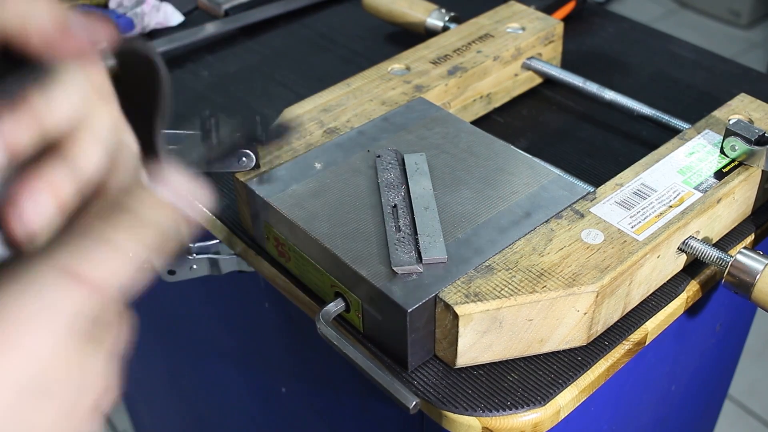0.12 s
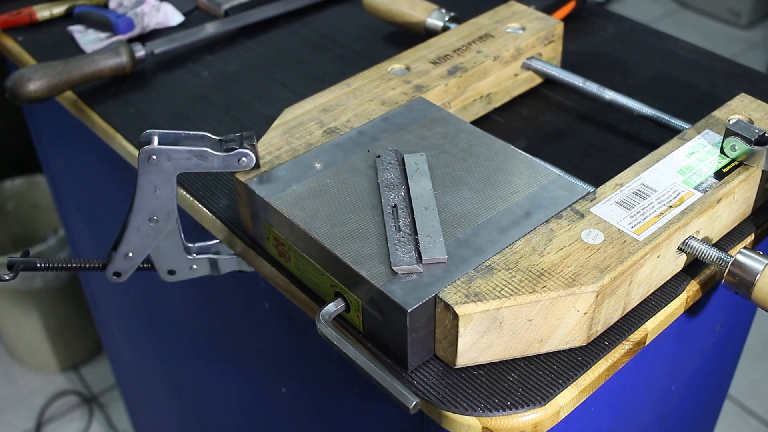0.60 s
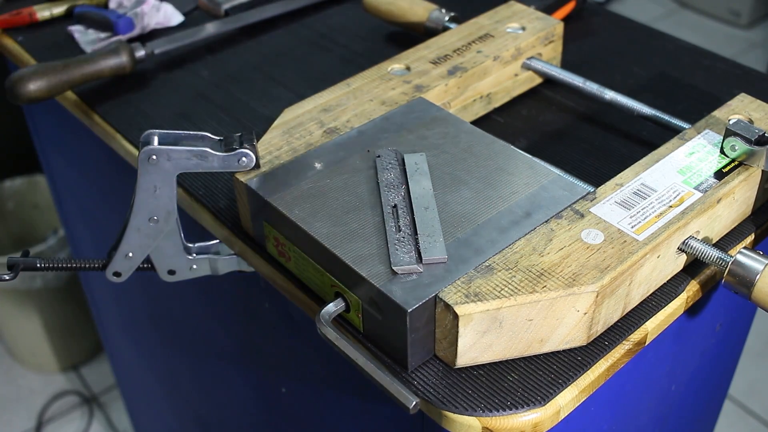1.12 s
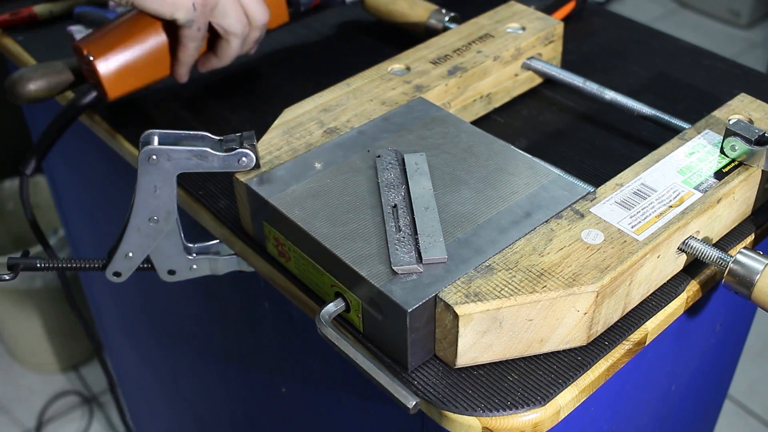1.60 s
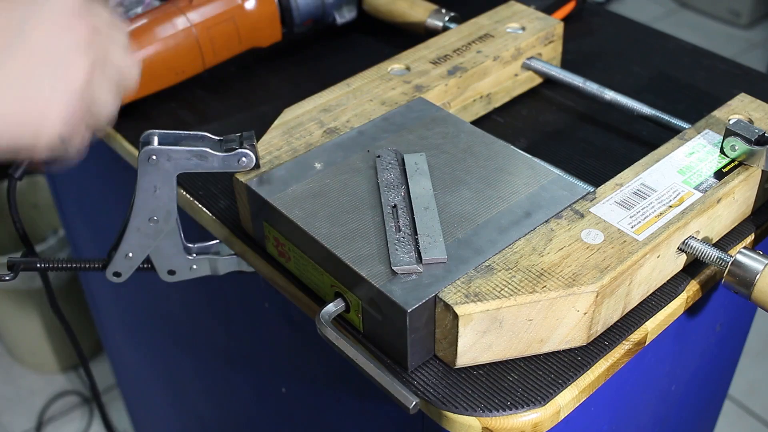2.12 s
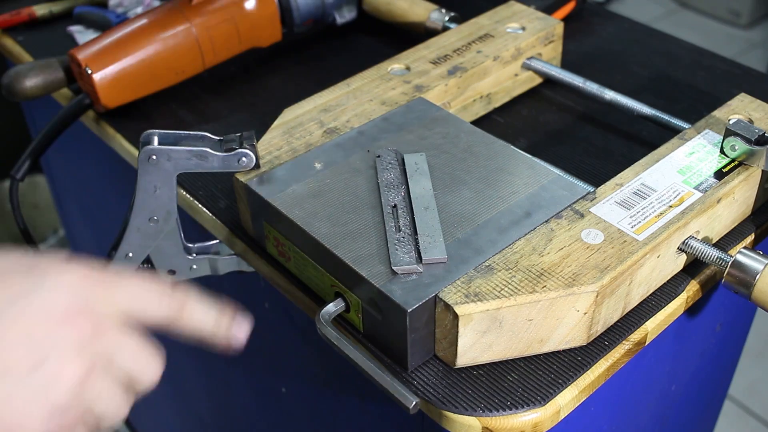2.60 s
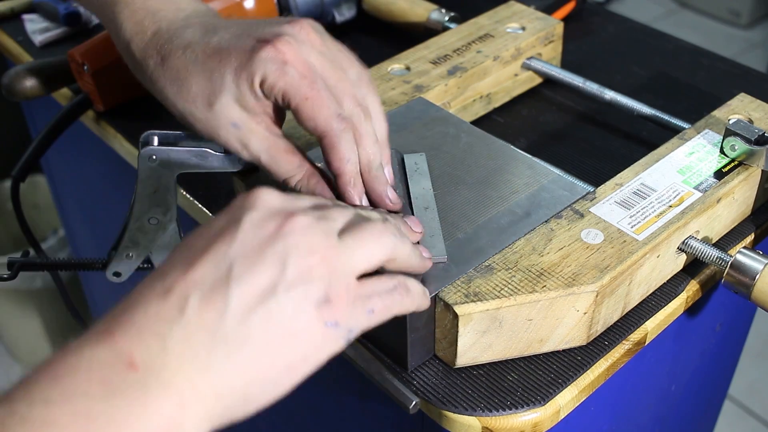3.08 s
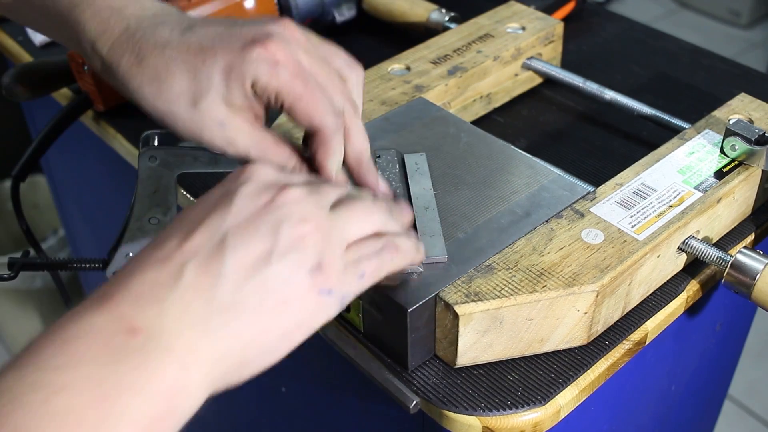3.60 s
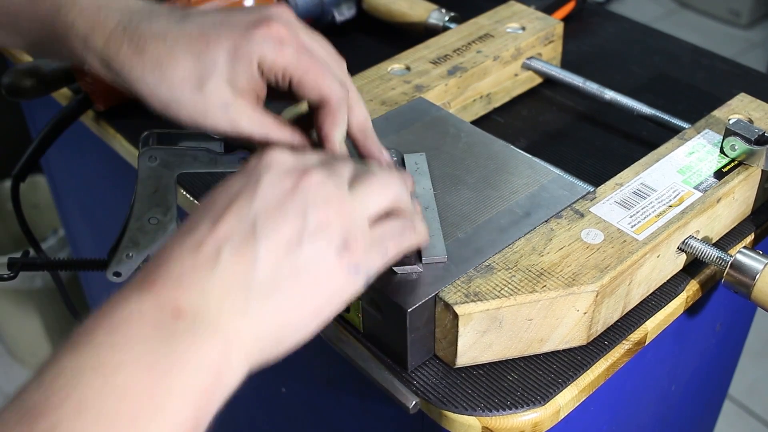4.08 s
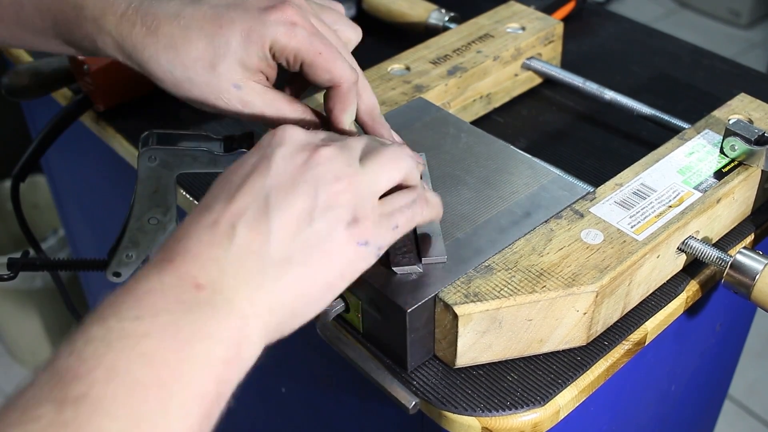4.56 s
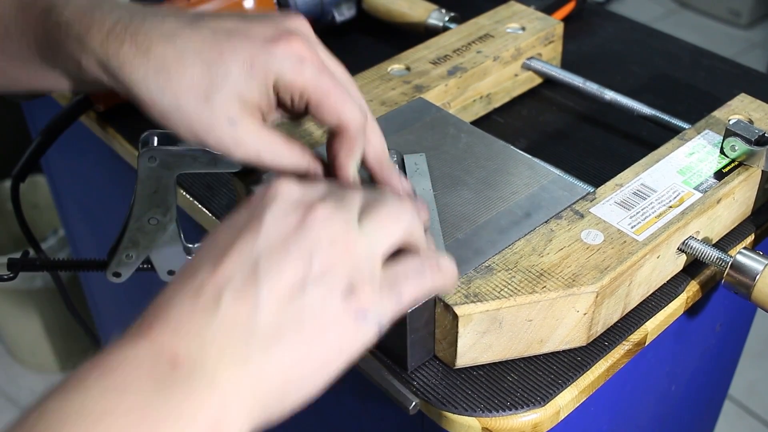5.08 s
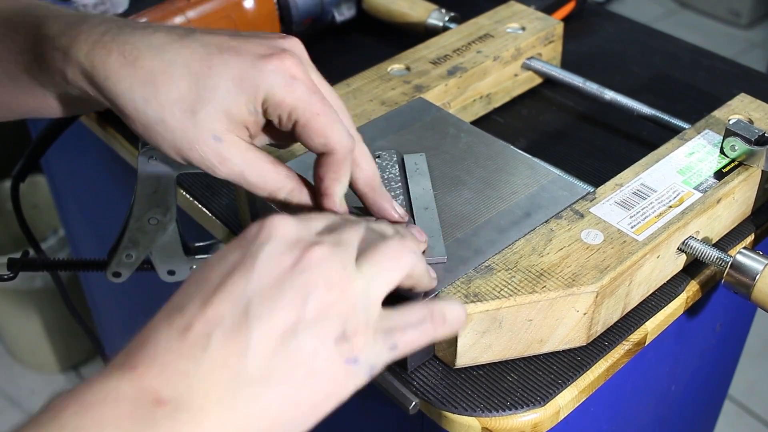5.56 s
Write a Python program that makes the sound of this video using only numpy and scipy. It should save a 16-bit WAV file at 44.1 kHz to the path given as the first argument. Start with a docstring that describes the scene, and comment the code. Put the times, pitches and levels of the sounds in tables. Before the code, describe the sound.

Close, dry mono pickup in a small workshop. From 0 s a hand-held electric tool runs: a buzzy whine with many rotor tones, bright gear rattle, airy fan hiss and a faint duct hum. At about 0.58 s a sharp knock marks the switch, followed around 0.65-0.8 s by low, thumping air gusts on the microphone. The pitch slides steadily down as the motor coasts; hiss and hum fade first, leaving a thinner, rattling whir. A softer knock with a low thud lands at 2.0 s over faint bench rumble, and the whir dwindles. At 2.77 s the sound cuts abruptly to quiet room noise, with faint scuffs and a small tick at 2.97 s. From 3.2 s a stone scrapes a steel bar back and forth, one gritty stroke roughly every 0.2 s, bright and ringing with a dull plate undertone, growing stronger until about 5.5 s, with the last stroke softer.

```python
"""Power tool, then stone on steel

A hand-held power tool runs, is switched off and coasts down while it is laid on a bench: rotor tones,
gear rattle, fan hiss and duct hum, with knocks, a bench rumble and air buffeting the microphone.
After a scene change, fingers slide a small abrasive stone to and fro on a steel bar lying on a heavy
plate: dense random grit rings the modes of the bar; a short noise tail is the small workshop's answer."""
import sys
import numpy as np
from scipy import signal
from scipy.fft import rfft, irfft, next_fast_len
from scipy.io import wavfile
from scipy.ndimage import uniform_filter1d, map_coordinates

SR = 44100
rng = np.random.default_rng(int(sys.argv[2]) if len(sys.argv) > 2 else 0)


def log_audio(samples):
    """Write samples as a 16-bit WAV file to the path given in sys.argv[1]."""
    # one column per channel
    frames = np.atleast_2d(samples).T
    # limit to full scale, then quantise
    limited = np.clip(frames, -1, 1)
    pcm = np.round(limited * 32767).astype(np.int16)
    wavfile.write(sys.argv[1], SR, pcm)


def elevation(decibels):
    """Turn decibel levels (scalar or array-like) into linear amplitude ratios."""
    levels = np.asarray(decibels, float)
    return 10 ** (levels / 20)


N = 250473
TIME = np.arange(N) / SR
CUT_S = 2.767

# Stone strokes, forth and back in turn. Each row: start in seconds, time to full speed in seconds,
# slowness of the start (exponent), level in dB, lowest mode family in dB before the shift by place.
STROKES = [(3.197, .17, 1.64, -22, -1.5), (3.493, 0.073, 0.69, -19.5, -2), (3.701, 0.072, 0.51, -20, -2),
           (3.902, 0.091, 0.95, -17.5, -4), (4.117, 0.099, 0.35, -19, -3.5), (4.314, .11, 0.74, -16, -7),
           (4.527, 0.085, 0.66, -17, -7), (4.722, 0.1, 0.59, -17, -10.5), (4.922, 0.08, 0.97, -15.5, -6.5),
           (5.12, 0.096, 0.6, -15.5, -8.5), (5.319, 0.083, 0.93, -15.5, -7), (5.516, .095, 0.42, -19, -4)]
# Fingers nudge the stone into place. Each row: start in seconds, width of the slowing bell in seconds,
# level in dB, second mode family in dB re the upper modes.
NUDGES = [(2.765, 0.062, -42, 14.5), (2.846, 0.026, -33.5, 10.5)]
NUDGE_RISE_S, NUDGE_SLOWNESS, NUDGE_LOW_DB = 0.005, 0.27, 16.5
NUDGE_PLATE_DB = -5  # light nudges barely reach the plate
LAST_TURN_S = 5.72
SLOWING_SHARE = 0.29  # width of the slowing bell, as a share of the time left until the hand turns
# Stone is set down. Each row: start in seconds, driving burst in dB.
TAPS = [(2.9704, -10), (2.984, -25), (3.0084, -32)]
# Steel bar, bending modes split by the plate under it, low to high families.
# Each row: frequency in Hz, width of the first resonator in Hz, relative gain in dB.
BAR_LOW_MODES = [(2580, 376, -7.5), (2907, 210, -2.5), (3240, 170, -2.5), (3385, 45, -1.5), (3536, 390, -3)]
BAR_MID_MODES = [(4886, 1000, -7), (5800, 310, -0.5), (5930, 160, 6), (6517, 620, 3.5), (6984, 42, 10.5),
                 (7130, 450, -17)]
BAR_TOP_MODES = [(7280, 265, -7.5), (8237, 810, -3), (8894, 102, -8.5), (9170, 120, 1), (9050, 1800, -15)]
BAR_SHEEN_MODES = [(10730, 2800, -6.5), (12290, 610, -13), (13840, 390, -3), (12340, 3700, -9.5),
                   (15060, 460, -12.5)]
# Families re the upper modes, set by where the stone bears: near end in dB, far end in dB.
LOW_BY_PLACE_DB, MID_BY_PLACE_DB, SHEEN_DB = (-2, 1.62), (-5, 0.61), -2.5
MODE_WANDER_DB, SLIDE_SHARE = 3.2, 0.018
# Heavy plate spectrum. Each row: frequency in Hz, relative level in dB per Hz.
PLATE_SPECTRUM = [(24, -82), (40, -27), (281, -14), (415, -18), (739, -12.5), (832, -15.5), (1970, -5.5),
                  (2300, -4), (2990, -19.5), (5060, -120)]
PLATE_FOLLOWS_LOW = 0.34  # dB on the plate per dB of the lowest mode family
PLATE_WANDER_DB = 3.5

# Rotor: steady under current, then slowed by bearing friction and by fan drag (grows with speed squared).
FULL_TURNS_PER_S, SWITCH_OFF_S = 239.3, 0.59
FRICTION_TURNS_PER_S2, FAN_DRAG_PER_TURN = 79, 6e-4
# Tones locked to the rotor (fan blades, commutator bars, gear teeth), as multiples of the turn rate.
MULTIPLES = [6, 9, 12, 15, 18, 24, 25, 29, 30, 36, 42, 48, 54, 60]
# Strength of each multiple in dB, with the current on and coasting.
POWERED_DB = [-7, -20, -4, -11, -8, -12, -12, -4, -4, -26, -28, -28, -30, -30]
COASTING_DB = [-9, -14, -9, -19, -9, -6, -22, -18, -10, -11, -16, -12, -18, -17]
TONE_FLICKER_DB = 4.5
# Gears and brushes as heard while the tool is swung round and laid down.
# Each row: time in seconds, rattle level in dB.
GEARS_LEVEL = [(0.24, -41.5), (0.61, -36.5), (0.86, -39.5), (1.32, -48), (1.58, -48.5), (2.11, -48),
               (2.62, -56.5), (2.75, -58.5)]
# Housing response to rattle at middle speed, to rattle at low speed, and to rotor tones.
# Each row: frequency in Hz, gain in dB.
HOUSING = [(1180, -83), (2000, -40), (2220, -7), (2560, -41), (3260, 3), (4070, 2), (5840, 2.5),
           (6750, 10.5), (10000, -14.5), (15500, -5)]
HOUSING_SLOW = [(880, -57), (1500, -44), (2170, -25), (2970, -2), (3580, 7), (4100, -5), (4600, -14),
                (5090, -6), (5670, -10), (12100, -29), (15500, -18)]
HOUSING_TONES = [(700, -32), (1350, -13), (1750, -23), (2200, -17), (2600, -19), (3300, -3), (4300, -9),
                 (5300, 0), (6200, -8), (7050, 0), (7900, -22), (12000, -34)]
# Cooling air spectrum. Each row: frequency in Hz, relative level in dB per Hz.
AIR_SPECTRUM = [(120, -47), (200, -12.5), (607, -2), (1030, -3), (1430, 3), (2290, -6.5), (2800, 1),
                (4030, -5), (6960, 0.5), (11000, -14), (15500, -19)]
# Cooling air and duct hum: level at full speed, amplitude as a power of speed.
AIR_DB, AIR_POWER = -37.4, 1.01
HUM_DB, HUM_POWER = -47.5, 6.1
AWAY_DB, AWAY_S = -17.5, 1.41  # the outlet turns away from the microphone
DUCT_HZ, DUCT_WIDTH_HZ = 627, 200
# Tool knocks, switch and bench. Each row: start in seconds, peak of the ring in dB, thud in dB,
# tail of the crack in seconds.
KNOCKS = [(0.575, -24, -80, 0.015), (1.991, -29.5, -42.5, 0.14)]
# Knock modes, the bench thud first, then the housing.
# Each row: frequency in Hz, relative gain in dB, 60 dB decay in seconds.
KNOCK_MODES = [(167, 0, 0.12), (1390, -6, 0.034), (1970, -9, 0.05), (5450, 3, 0.025), (5750, 4, 0.04),
               (7550, -4, .04), (8600, -1.5, 0.026)]
# Gusts over the microphone. Each row: start of the hold in seconds, hold in seconds, gain in dB.
GUSTS = [(.03, 0.079, -54), (.13, 0.02, -50), (.28, 0.11, -56), (0.656, 0.039, -26.5), (.725, 0.057, -33),
         (.85, 0.12, -59), (1.1, 0.17, -81)]
GUST_RISE_DB_PER_S, GUST_FALL_DB_PER_S = 1500, 450
# The tool's weight settles on the bench.
TOUCH_S, SETTLE_S, SETTLE_DB, SETTLED_DB = 1.72, 2.04, -63, -88
SETTLE_RISE_DB_PER_S, SETTLE_FALL_DB_PER_S = 45, 105
# Quiet shop spectrum. Each row: frequency in Hz, relative level in dB per Hz.
SHOP_SPECTRUM = [(18, -48), (30, -3.5), (292, -3), (606, -8), (1720, -17), (4090, -18.5), (8950, -1.5),
                 (12600, -17), (15500, -18)]
SHOP_DB = -60


def level(x, db=0):
    """Scales to an rms level."""
    return x * elevation(db) / np.sqrt(np.mean(x ** 2))


def curve(rows):
    """Columns of a (s, value, ..) table at every sample."""
    s, *columns = np.transpose(rows)
    return [np.interp(TIME, s, c) for c in columns]


def colour(x, points):
    """Filters through a (Hz, dB) spectrum."""
    size = next_fast_len(N + SR // 4)
    hz, db = np.transpose(points)
    bins_hz = np.arange(size // 2 + 1) * SR / size
    gain = elevation(np.interp(np.log(bins_hz + 1), np.log(hz), db))
    return irfft(rfft(x, size) * gain, size)[:N]


def resonance(x, hz, width_hz):
    """Two-pole resonance, gain 1 at the centre."""
    return signal.lfilter(*signal.iirpeak(hz, hz / width_hz, SR), x)


def walk(rate):
    """Random levels held 1 / rate s and slewed twice; spread near 1."""
    k = int(SR / rate)
    held = np.repeat(rng.standard_normal(N // k + 1), k)
    return 1.59 * uniform_filter1d(uniform_filter1d(held, k), k)[:N]


def grit(rate, spread_db):
    """Random catches at a mean rate per second, mostly small, a few large; unit rms."""
    hit, size, sign = rng.random((3, N))
    sizes = elevation(-spread_db * np.log(size + 2e-4))
    return level((hit < rate / SR) * sizes * np.sign(sign - 0.5))


def blow(s, db, tail_s):
    """A burst of noise that dies away by 60 dB in tail_s."""
    age = TIME - s
    decay = np.exp(-np.log(1000) * np.maximum(age, 0) / tail_s)
    return elevation(db) * (age >= 0) * rng.standard_normal(N) * decay


def swell(s, held_s, db, rise_db_per_s, fall_db_per_s):
    """Gain that climbs to a level, holds and sinks, straight in dB."""
    before_s = np.clip(s - TIME, 0, 1)
    after_s = np.clip(TIME - s - held_s, 0, 1)
    return elevation(db - rise_db_per_s * before_s - fall_db_per_s * after_s)


def stone():
    """Dense grit with stick-slip surges drives the bar and the plate; taps ring three of the bar's families."""
    push, pace = hand()
    places = []
    for s, rise, _, fall, _, early, late in moves():
        places += [(s + rise / 2, *early), (s + rise + fall, *late)]
    low_db, mid_db = curve(places)
    surges = elevation(1.4 * walk(350))
    # grains near and far from a node drive each family in their own way
    families = []
    for modes in (BAR_LOW_MODES, BAR_MID_MODES, BAR_TOP_MODES, BAR_SHEEN_MODES):
        ringing = bar(surges * grit(10000, 1.7), modes, MODE_WANDER_DB)
        families.append(level(detuned(ringing, SLIDE_SHARE, 12)))
    # a slow stone strikes too softly to wake the highest modes
    shares = elevation(low_db), elevation(mid_db), 1, elevation(SHEEN_DB) * (pace + 0.03) ** 0.27
    mixed = sum(g * v for g, v in zip(shares, families))
    rub = push * mixed / np.sqrt(sum(g ** 2 for g in shares))
    # the heavy plate follows the push more weakly
    scouring = surges * grit(10000, 1.8) + 0.7 * grit(900, 2.2)
    plate = level(colour(scouring, PLATE_SPECTRUM) * elevation(PLATE_WANDER_DB * walk(8)), -40)
    stroke_plate_db = 2.5 + PLATE_FOLLOWS_LOW * low_db
    plate_db = np.where(TIME < STROKES[0][0], NUDGE_PLATE_DB, stroke_plate_db)
    plate = plate * push ** 0.39 * elevation(plate_db)
    taps = sum(blow(s, db, 0.0043) for s, db in TAPS)
    tapped = elevation(12) * bar(taps, BAR_LOW_MODES, 0) + elevation(-4.5) * bar(taps, BAR_MID_MODES, 0)
    tapped = tapped + elevation(-7) * bar(taps, BAR_TOP_MODES, 0) + elevation(-3) * resonance(taps, 1180, 140)
    return rub + plate + tapped


def bar(force, modes, wander_db):
    """Rings one family of modes; the place of contact wanders and shares the drive out anew among them."""
    shares = np.array([elevation(wander_db * walk(16)) for _ in modes])
    shares = shares / np.sqrt(np.mean(shares ** 2, axis=0))
    out = 0
    for k, (hz, width_hz, db) in enumerate(modes):
        ringing = resonance(resonance(force, hz, width_hz), hz, 2 * width_hz)
        out = out + (-1) ** k * elevation(db) * shares[k] * ringing
    return out


def detuned(x, share, rate):
    """The moving stone and fingers load the bar, so its modes slide a little in pitch."""
    return map_coordinates(x, [np.arange(N) + np.cumsum(share * walk(rate))], mode="mirror")


def hand():
    """Each stroke breaks loose, speeds up along an arc, slows along a bell; gives push and share of full speed."""
    push, pace = np.zeros((2, N))
    for s, rise, slowness, fall, db, _, _ in moves():
        age = TIME - s
        arc = np.sin(np.pi / 2 * np.clip(age / rise, 0, 1)) ** slowness
        rising = arc * np.clip(age / (0.091 * rise), 0, 1)
        # the stone sticks at the turn and lets go with a jerk
        jerk = 0.06 * np.clip(age / 0.0095, 0, 1) * np.exp(-np.maximum(age, 0) / 0.048)
        slowing = np.exp(-0.5 * (np.maximum(age - rise, 0) / fall) ** 2)
        shape = (rising + jerk) * slowing
        pace, push = np.maximum(pace, shape), np.maximum(push, elevation(db) * shape)
    return push, pace


def moves():
    """All hand moves: start s, rise s, slowness, fall s, dB, (lowest, second family dB) early and late."""
    rows = []
    for s, fall, db, mid_db in NUDGES:
        place = (NUDGE_LOW_DB, mid_db)
        rows.append((s, NUDGE_RISE_S, NUDGE_SLOWNESS, fall, db, place, place))
    turns_s = [row[0] for row in STROKES[1:]] + [LAST_TURN_S]
    for k, ((s, rise, slowness, db, low_db), turn_s) in enumerate(zip(STROKES, turns_s)):
        ends = [(low_db + LOW_BY_PLACE_DB[end], MID_BY_PLACE_DB[end]) for end in (k % 2, 1 - k % 2)]
        rows.append((s, rise, slowness, SLOWING_SHARE * (turn_s - s - rise), db, *ends))
    return rows


def tool():
    """Rotor tones and gear rattle sound through the housing; the fan hisses and hums beside them."""
    speed = rotor()
    turns = np.cumsum(speed) / SR
    gears_db = curve(GEARS_LEVEL)[0]
    slowed_db = 20 * np.log10(speed / FULL_TURNS_PER_S)
    whine = colour(rotor_tones(speed, turns, gears_db), HOUSING_TONES)
    gears = elevation(gears_db) * gear_rattle(speed, turns)
    return gears + whine + cooling_air(slowed_db) + duct_hum(slowed_db)


def rotor():
    """Turns a second: constant, then the closed-form coast-down under friction and square-law drag."""
    scale = np.sqrt(FRICTION_TURNS_PER_S2 / FAN_DRAG_PER_TURN)
    coast_s = np.clip(TIME - SWITCH_OFF_S, 0, CUT_S - SWITCH_OFF_S)
    angle = np.arctan(FULL_TURNS_PER_S / scale) - scale * FAN_DRAG_PER_TURN * coast_s
    return scale * np.maximum(np.tan(angle), 0)


def rotor_tones(speed, turns, gears_db):
    """Sines at multiples of the turn rate; worn brushes let each waver in strength and phase."""
    coasting = np.clip((238 - speed) / 8, 0, 1)
    tones = 0
    for k, on_db, off_db in zip(MULTIPLES, POWERED_DB, COASTING_DB):
        tone_db = on_db + coasting * (off_db - on_db) + TONE_FLICKER_DB * walk(15.98)
        phase_turns = k * turns + 0.009 * k * walk(50)
        tones = tones + elevation(tone_db) * np.sin(2 * np.pi * phase_turns)
    # tones fade more slowly than the rattle until the rotor nearly stands
    fading_db = 12 * np.clip(105 / speed - 1, 0, 2)
    return tones * elevation(0.73 * gears_db - 8 - fading_db)


def gear_rattle(speed, turns):
    """The same flaws come round on every turn, among chance rattle; the housing response shifts at low speed."""
    slow = np.clip((125 - speed) / 35, 0, 1)
    flaws = rng.standard_normal(160)[(turns * 160).astype(int) % 160]
    rattle = (grit(8000, 2.2) + 0.5 * flaws) * elevation(walk(20))
    return (1 - slow) * level(colour(rattle, HOUSING)) + slow * level(colour(rattle, HOUSING_SLOW))


def cooling_air(slowed_db):
    """Fan hiss: coloured noise that weakens with speed and as the outlet turns away."""
    away = np.sin(np.pi / 2 * np.minimum(TIME / AWAY_S, 1)) ** 2
    air = level(colour(rng.standard_normal(N), AIR_SPECTRUM)) * elevation(walk(26.6))
    return elevation(AIR_DB + AIR_POWER * slowed_db + AWAY_DB * away) * air


def duct_hum(slowed_db):
    """Noise through the duct resonance twice; falls steeply with speed."""
    once = resonance(rng.standard_normal(N), DUCT_HZ, DUCT_WIDTH_HZ)
    hum = level(resonance(once, DUCT_HZ, DUCT_WIDTH_HZ))
    return elevation(HUM_DB + HUM_POWER * slowed_db) * hum


def knocks():
    """Each knock cracks, rings the housing and, a moment later, thuds into the bench."""
    out = 0
    for s, db, thud_db, tail_s in KNOCKS:
        contact = blow(s, 0, tail_s / 2)
        ring = sum(elevation(mode_db) * resonance(contact, hz, np.log(1000) / np.pi / t60_s)
                   for hz, mode_db, t60_s in KNOCK_MODES[1:])
        crack = colour(blow(s, -5, tail_s), [(70, -35), (300, -9.5), (1200, -8.5), (6000, 3.5), (12000, -19)])
        hz, mode_db, t60_s = KNOCK_MODES[0]
        age = np.maximum(TIME - s - 0.006, 0)
        thud = elevation(thud_db + mode_db) * np.sin(2 * np.pi * hz * age) * np.exp(-np.log(1000) * age / t60_s)
        out = out + elevation(db) * (ring / np.abs(ring).max() + crack) + thud
    return out


def buffet():
    """Slow pressure swings right on the microphone: low band noise gated by gusts."""
    band = signal.butter(2, [28, 75], "bandpass", fs=SR, output="sos")
    swings = signal.sosfilt(band, rng.standard_normal(N))
    # swings of even size
    swings = swings / np.sqrt(uniform_filter1d(swings ** 2, SR // 30) + 1e-12)
    gusts = sum(swell(*gust, GUST_RISE_DB_PER_S, GUST_FALL_DB_PER_S) for gust in GUSTS)
    return gusts * signal.sosfiltfilt(signal.butter(1, 110, fs=SR, output="sos"), swings)


def bench():
    """A low rumble in the bench top while the tool is laid down."""
    rumble = colour(rng.standard_normal(N), [(30, -40), (80, -6), (170, -2.5), (330, -8.5), (700, -39)])
    weight = swell(SETTLE_S, 0, SETTLE_DB, SETTLE_RISE_DB_PER_S, SETTLE_FALL_DB_PER_S) + elevation(SETTLED_DB)
    return (TIME > TOUCH_S) * weight * level(rumble)


def workshop(x, t60_s, wet_db):
    """Adds a short diffuse tail, duller than the direct sound."""
    age = np.arange(SR // 2) / SR
    tail = rng.standard_normal(len(age)) * np.exp(-np.log(1000) * age / t60_s) * (age > 0.004)
    tail = signal.sosfilt(signal.butter(2, 9000, fs=SR, output="sos"), tail)
    return x + elevation(wet_db) * signal.fftconvolve(x, tail / np.sqrt(np.sum(tail ** 2)))[:N]


def quiet_shop():
    """Steady coloured noise of the room."""
    return level(colour(rng.standard_normal(N), SHOP_SPECTRUM), SHOP_DB)


def scene():
    """The tool before the cut, the stone and the quiet shop after it."""
    first = tool() + buffet() + bench() + workshop(knocks(), 0.26, -6)
    second = workshop(stone(), 0.34, -11.5) + quiet_shop()
    return np.where(TIME < CUT_S, first, second)[None]


def low_pass(x):
    """Removes everything above the highest recorded frequency."""
    return signal.sosfilt(signal.butter(12, 15870, fs=SR, output="sos"), x)


def record(dry):
    """Returns the finished mono mix."""
    return low_pass(dry)


dry = scene()
out = record(dry)
log_audio(out)
```